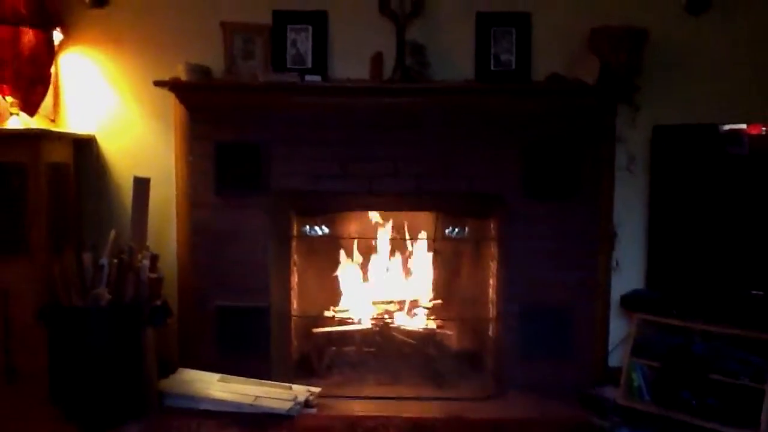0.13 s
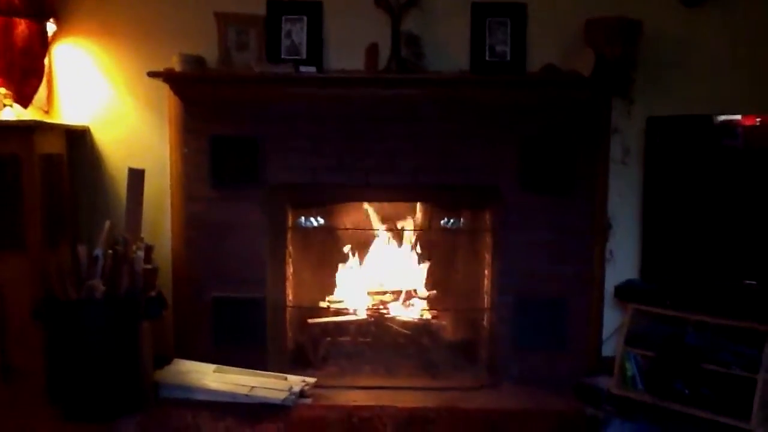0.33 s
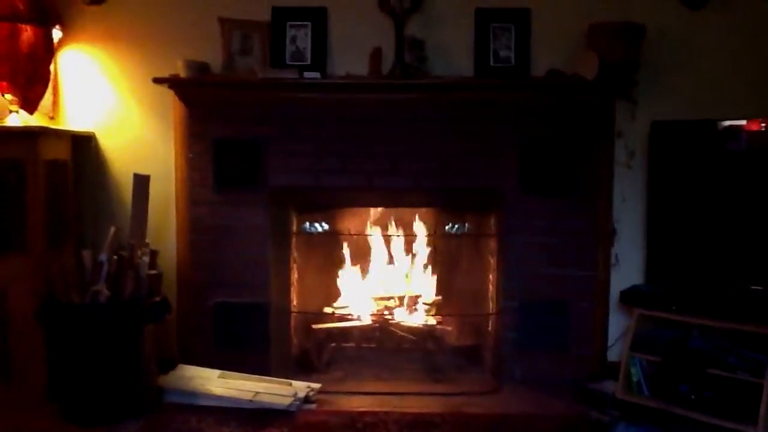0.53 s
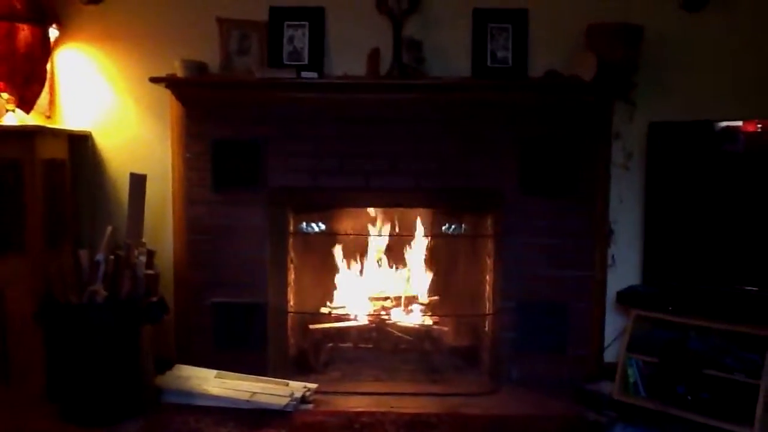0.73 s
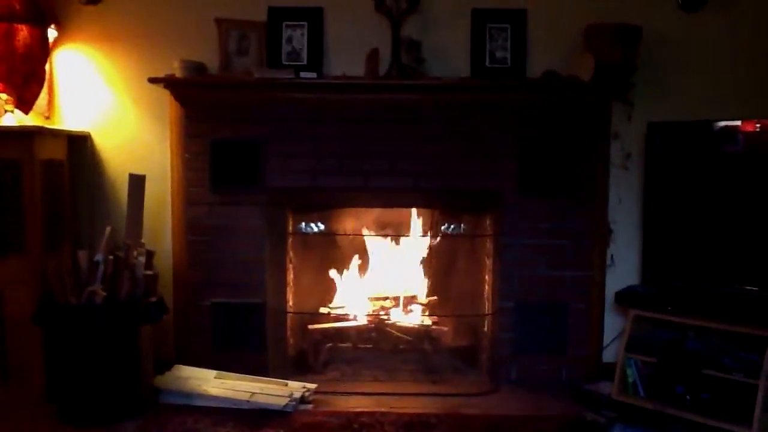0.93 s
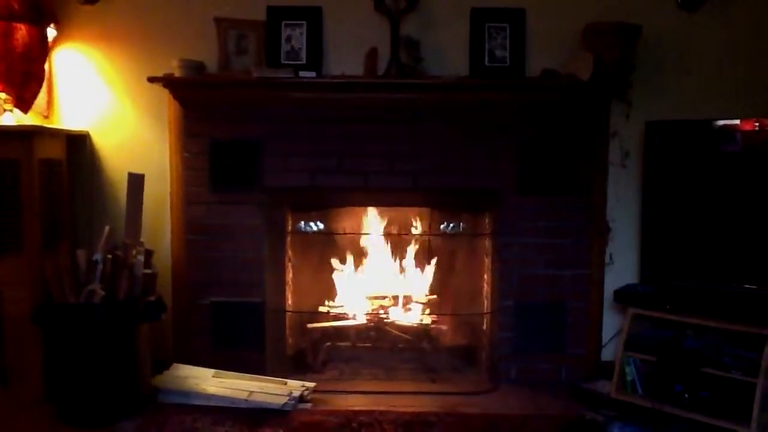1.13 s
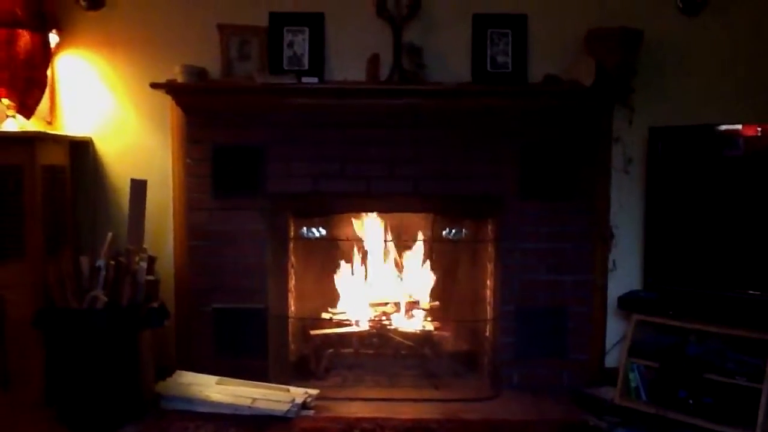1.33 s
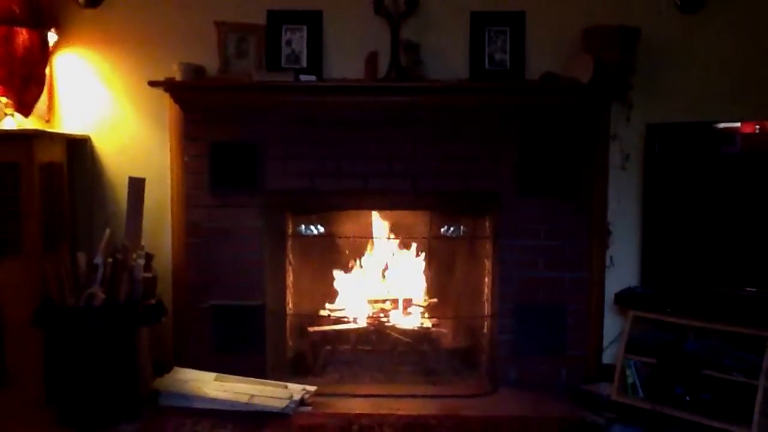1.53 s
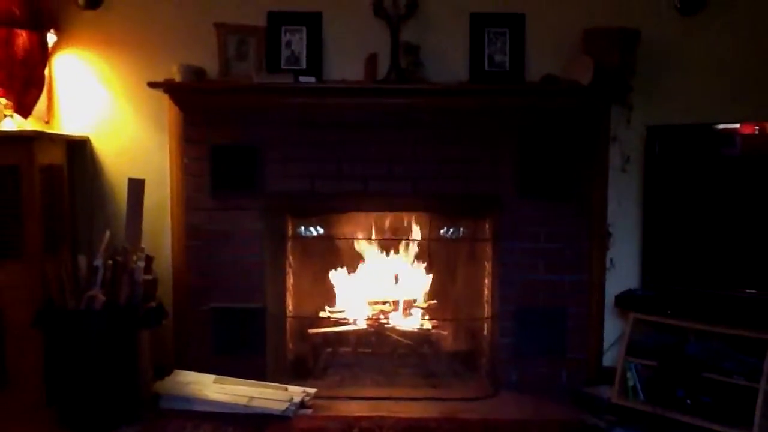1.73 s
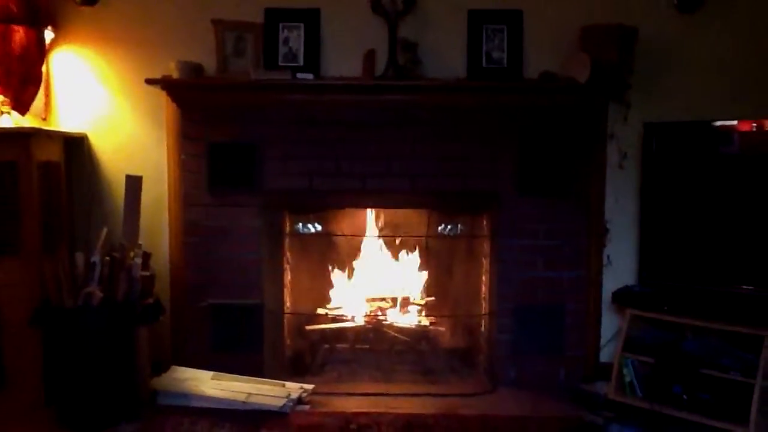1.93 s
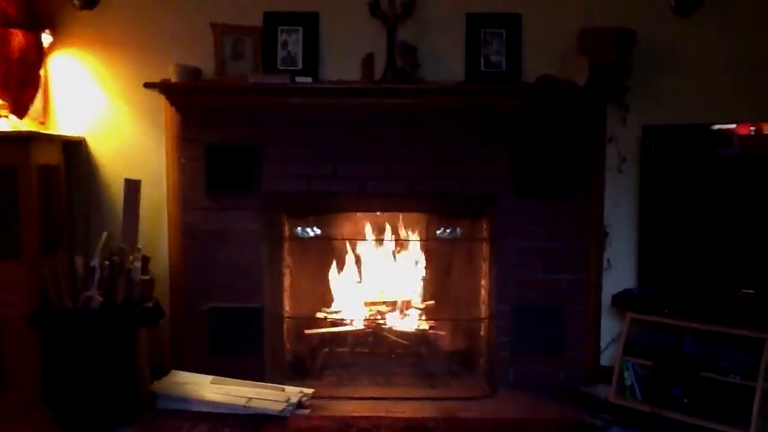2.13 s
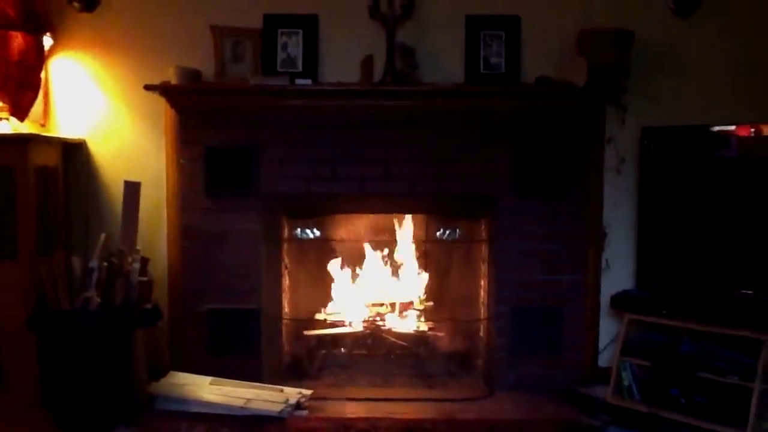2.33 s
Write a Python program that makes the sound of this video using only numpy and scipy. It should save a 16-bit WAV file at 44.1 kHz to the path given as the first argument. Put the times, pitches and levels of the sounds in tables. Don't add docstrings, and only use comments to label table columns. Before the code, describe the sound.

A wood fire burning in a brick fireplace, with irregular sharp pops and faint ember ticks over a soft low flutter, heard from across a quiet living room through a slightly hissy microphone.

```python
import sys
import numpy as np
from scipy import signal
from scipy.fft import rfft, irfft
from scipy.io import wavfile
from scipy.ndimage import map_coordinates

SR = 44100
rng = np.random.default_rng(int(sys.argv[2]) if len(sys.argv) > 2 else 0)


def gain_from_db(level_db):
    decades = np.asarray(level_db, float) / 20
    return 10 ** decades


def inscribe(sig):
    pcm = np.round(np.clip(np.atleast_2d(sig).T, -1, 1) * 32767)
    wavfile.write(sys.argv[1], SR, pcm.astype(np.int16))


N = 110250

# time in seconds, level in dB.
BLAZE_CURVE = [(0.0, -67.5), (0.16, -61.5), (0.35, -62), (0.5, -65), (0.73, -66), (0.88, -64.5),
               (2.32, -68), (2.5, -67.5)]
# frequency in Hz, level in dB.
FLAME_SPECTRUM = [(18, -75), (30, -45), (108, -8), (173, 1), (223, -4), (347, -15), (394, -8.5), (436, -17),
                  (900, -20.5), (1170, -86), (1980, -120)]
# start in seconds, peak level in dB, ringing pitch in Hz.
FLAME_PUFFS = [(0.145, -50, 225), (0.203, -39, 204), (0.417, -45, 168), (0.512, -46, 182),
               (0.668, -51.5, 183), (0.898, -44.5, 189), (1.036, -76, 203), (1.216, -59, 174),
               (1.334, -47.5, 180), (1.433, -51, 176), (1.606, -59, 182), (1.692, -47, 195),
               (1.856, -49, 177.2), (2.044, -57, 173), (2.164, -50, 190), (2.443, -56.5, 172.4)]
POP_STARTS = [.1225, .1927, .2067, .4540, .5905, .7848, 1.0478, 1.2228, 1.5970, 1.7409, 1.7724, 1.7740,
              1.8222, 1.8248, 1.9078, 2.0453, 2.1485, 2.1503, 2.1877, 2.3362, 2.3505]
# strength in dB, wood resonance in Hz, bright edge in dB,
# thud in dB, directness of the view from the microphone in dB.
POP_KINDS = [(-48, 2400, -23, -4, -12), (-35.5, 2400, -21, 4, -15), (-18.5, 2530, -23, -2, -3),
             (-51.5, 2460, -23, 0, 3), (-54, 2800, -20, -7, -1), (-50, 2700, -23, -1, 3),
             (-50.5, 2400, -17.5, 4, -6), (-44.5, 3040, -25, -1.5, 4), (-54.5, 3400, -19, -13, 5),
             (-39.5, 2900, -24, 2.5, 2), (-44, 2300, -28, -6, 6), (-44.5, 3100, -2, -10, 4),
             (-46.5, 2460, -16, 4, -5), (-47, 2500, -21, -6, 12), (-49, 2157, -17, 0, 0),
             (-20, 2300, -9.5, 0, 2.5), (-47.5, 3000, -27, -8, 7), (-40, 3200, -19, -8, 5),
             (-19, 2220, -32, 1.5, -2), (-43.5, 3540, -18, 3, -2), (-53, 3100, -10, -4, 4)]
# frequency in Hz, level in dB.
EDGE_SPECTRUM = [(2500, -18.5), (4500, -10), (6500, -5), (8300, -6.5), (9300, -1), (10400, -10.5),
                 (12500, -6), (15500, -17)]
# frequency in Hz, level in dB.
THUD_SPECTRUM = [(60, -55), (170, -6.5), (300, -21.5), (550, -29), (900, -17.5), (1500, -24), (3000, -45)]
# delay in seconds, level in dB.
REFLECTIONS = [(.0005, -3), (.0015, -3), (.0024, -4), (.0036, -4), (.0052, -8), (.0102, -4), (.0118, -8),
               (.017, -12), (.0258, -10), (.028, -10), (.038, -13)]
# frequency in Hz, time to fall 60 dB in seconds.
ROOM_DECAY = [(300, 0.5), (800, 0.35), (2100, 0.29), (5500, 0.35), (14600, 0.2)]
# frequency in Hz, level in dB.
HISS_SPECTRUM = [(350, -41), (600, -4), (1300, -4), (2910, -0.5), (3240, -3.5), (5290, -4), (8870, -3.5),
                 (12600, -5.5), (15500, -5)]


def unit(x):
    return x / np.sqrt(np.mean(x ** 2) + 1e-20)


def along(points, hz):
    f, v = np.transpose(points)
    return np.interp(np.log(hz + 1), np.log(f + 1), v)


def coloured(spectrum):
    gain = gain_from_db(along(spectrum, np.fft.rfftfreq(N, 1 / SR)))
    return unit(irfft(rfft(rng.standard_normal(N)) * gain, N))


def wobble(rate):
    knots = rng.standard_normal(int(N * rate / SR) + 4)
    return map_coordinates(knots, [np.arange(N) * rate / SR])


def flame_roar():
    blaze_db = np.interp(np.arange(N) / SR, *np.transpose(BLAZE_CURVE))
    return coloured(FLAME_SPECTRUM) * gain_from_db(blaze_db + 1 + 2 * wobble(12))


def flame_puffs():
    rise_s, t60 = 0.0035, 0.12
    out, t = np.zeros(N + SR), np.arange(SR // 4) / SR
    for start, db, hz in FLAME_PUFFS:
        envelope = (1 - np.exp(-t / rise_s)) ** 2 * gain_from_db(-60 * t / t60)
        ring = np.sin(2 * np.pi * hz * t) * envelope
        out[round(start * SR):][:len(t)] += gain_from_db(db - 6) * ring / np.abs(ring).max()
    return out[:N]


def causal(gain):
    cepstrum = irfft(np.log(gain + 1e-6))
    half = len(cepstrum) // 2 - 1
    fold = np.concatenate([[1], np.full(half, 2), [1], np.zeros(half)])
    return irfft(np.exp(rfft(cepstrum * fold)))


def burst(body_hz, edge_db, thud_db):
    hz = np.fft.rfftfreq(2048, 1 / SR)
    q = 1.44 - 0.11 * thud_db
    body = 1 / (1.5 + (q * (hz / body_hz - body_hz / (hz + 1))) ** 2)
    body = body / (1 + (hz / 4200) ** 8)
    thud = gain_from_db(thud_db + along(THUD_SPECTRUM, hz)) * (hz < 3000)
    edge = gain_from_db(edge_db + 9 + along(EDGE_SPECTRUM, hz))
    pulse = causal(body + thud + edge)[:1024]
    return pulse / np.abs(pulse).max()


def room_tail(t):
    from_s, rise_s = 0.019, 0.0021
    hz, frames, z = signal.stft(rng.standard_normal(len(t)), SR, nperseg=256)
    decay = gain_from_db(-60 * frames / along(ROOM_DECAY, hz)[:, None])
    room = signal.istft(z * decay, SR, nperseg=256)[1][:len(t)]
    room = room / (1 + np.exp(-(t - from_s) / rise_s))
    return room / np.linalg.norm(room)


def firebox_rattle(t):
    box = rng.standard_normal(len(t)) * gain_from_db(-60 * t / 0.1) * (t > REFLECTIONS[0][0])
    return box / np.linalg.norm(box)


def hearth(view_db):
    scatter_s, scatter_db = 0.0002, 1.5
    grate_s = 0.001
    t = np.arange(SR // 2) / SR
    path = gain_from_db(0.5) * room_tail(t) + gain_from_db(2.5) * firebox_rattle(t) + gain_from_db(view_db) * (t == 0)
    for delay, db in REFLECTIONS:
        shift, level = rng.standard_normal(2)
        smear_s = 0.00015 + 0.015 * delay
        copy = rng.standard_normal(256) * np.exp(-t[:256] / smear_s)
        copy_db = db + view_db * (delay < grate_s) + scatter_db * level
        at = round(abs(delay + scatter_s * shift) * SR)
        path[at:][:len(copy)] += gain_from_db(copy_db) * copy / np.linalg.norm(copy)
    return path


def embers():
    per_second, floor_db, spread_db = 120, -71, 3.5
    when, strength = rng.random((int(per_second * N / SR), 2)).T
    excess = np.minimum(-np.log(strength), 3.5)
    ticks = np.bincount((when * N).astype(int), gain_from_db(floor_db + spread_db * excess), N)
    one_tick = signal.fftconvolve(burst(2910, -33, 4), hearth(0))
    return signal.fftconvolve(ticks, one_tick)[:N]


def pops():
    out = np.zeros(N + SR)
    for start, (db, hz, edge_db, thud_db, view_db) in zip(POP_STARTS, POP_KINDS):
        sound = signal.fftconvolve(burst(hz, edge_db, thud_db), hearth(view_db))
        at = round(start * SR)
        out[at:][:len(sound)] += gain_from_db(db + 17) * sound / np.linalg.norm(sound)
    return out[:N]


def scene():
    return (pops() + embers() + flame_roar() + flame_puffs())[None]


def roll_off(x):
    return signal.sosfilt(signal.butter(12, 15910, fs=SR, output="sos"), x)


def record(dry):
    low_cut = signal.butter(2, 35, "high", fs=SR, output="sos")
    top = signal.cheby2(10, 50, 16100, fs=SR, output="sos")
    hissing = dry + gain_from_db(-63) * coloured(HISS_SPECTRUM)
    return roll_off(signal.sosfilt(np.vstack([low_cut, top]), hissing))


dry = scene()
out = record(dry)
inscribe(out)
```